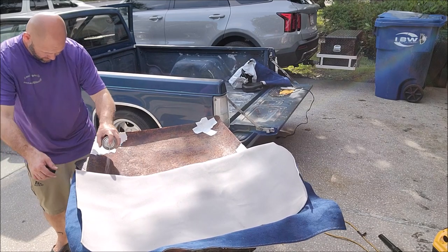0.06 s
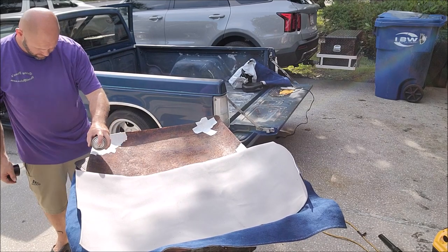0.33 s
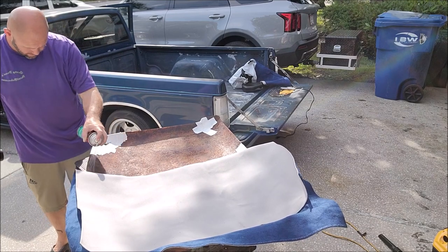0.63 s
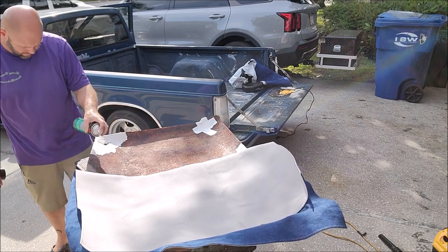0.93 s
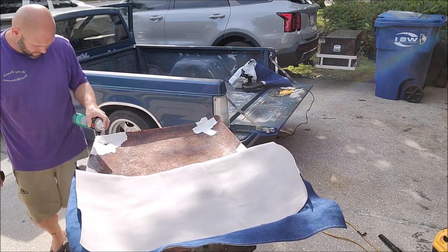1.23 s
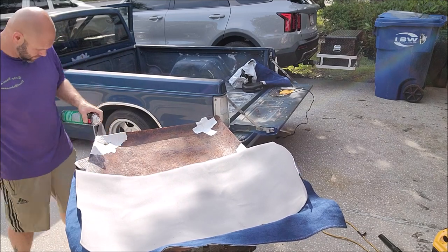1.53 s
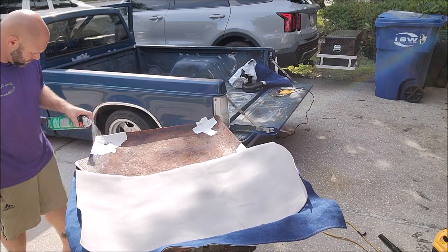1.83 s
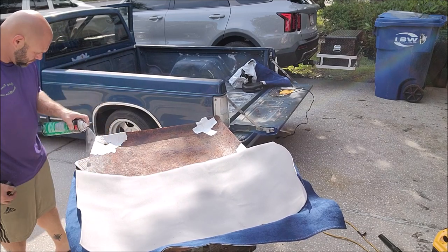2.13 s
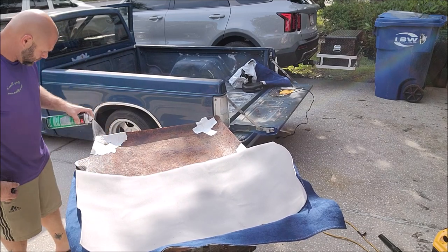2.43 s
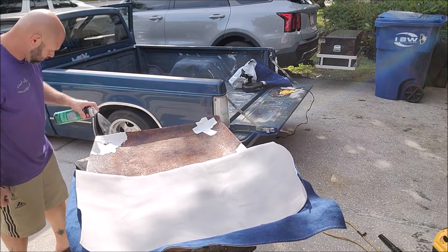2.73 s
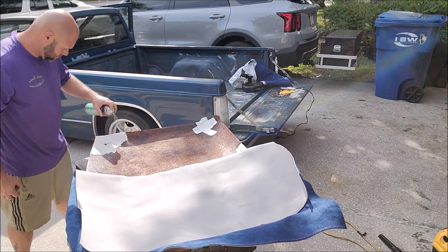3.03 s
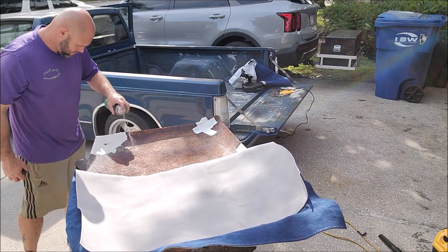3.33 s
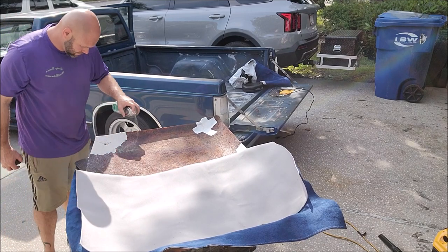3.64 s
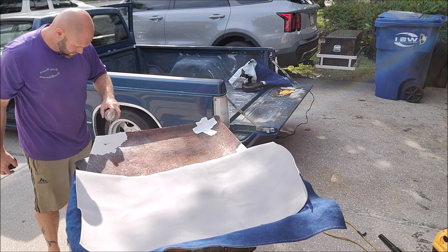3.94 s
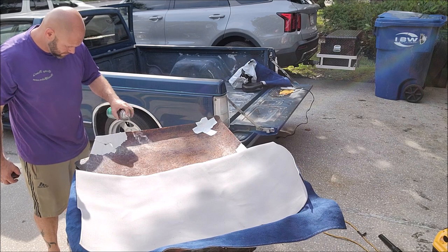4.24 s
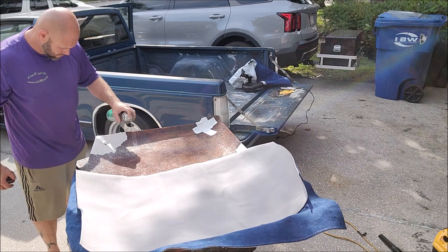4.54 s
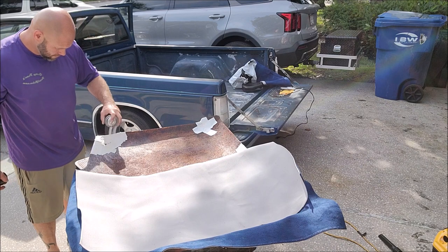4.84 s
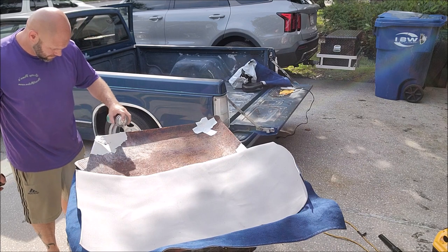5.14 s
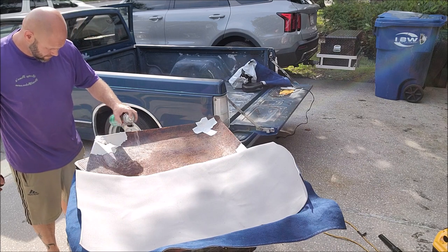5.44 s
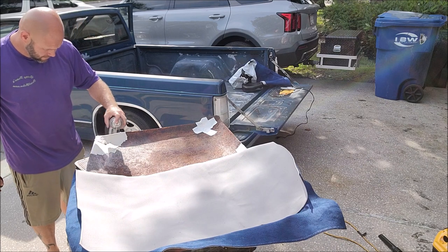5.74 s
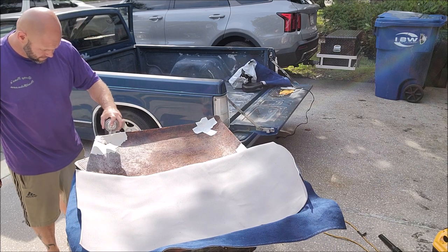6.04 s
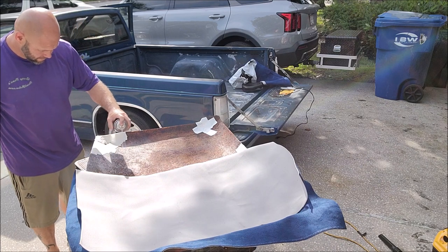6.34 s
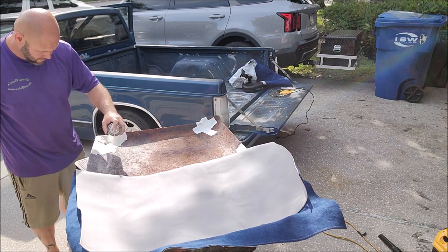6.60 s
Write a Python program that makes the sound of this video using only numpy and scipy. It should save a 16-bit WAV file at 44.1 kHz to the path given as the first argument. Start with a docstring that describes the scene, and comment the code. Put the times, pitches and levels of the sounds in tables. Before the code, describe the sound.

Bright, wavering hiss of spray adhesive, broken twice early on and then continuous, with a low traffic rumble behind.

```python
"""On a driveway, spray adhesive is swept over a curved sheet-metal panel in three passes.
Distant traffic rumbles throughout, with an engine humming under it. The hiss is turbulent jet noise,
beamed by the nozzle; it interferes with its reflection off the panel, so its colour shifts as the can
moves. A shoe scuffs the asphalt with gritty friction noise, and glue spits now and then in dull puffs."""
import sys
import numpy as np
from scipy import signal
from scipy.fft import rfft, irfft
from scipy.io import wavfile

SR = 44100
rng = np.random.default_rng(int(sys.argv[2]) if len(sys.argv) > 2 else 0)


def inscribe(sig):
    """Save sig as 16-bit PCM at rate SR to the path in sys.argv[1].

    A 1-D sig is mono; a 2-D sig holds one channel per row.
    Samples are clipped to [-1, 1] before scaling.
    """
    pcm = np.round(np.clip(np.atleast_2d(sig).T, -1, 1) * 32767)
    wavfile.write(sys.argv[1], SR, pcm.astype(np.int16))


N = 294147
TIME = np.arange(N) / SR


def from_db(db):
    """Amplitude ratio of a level in decibels."""
    return 10 ** (np.asarray(db) / 20)


def unit_rms(x):
    """Normalisation to a root mean square of 1."""
    return x / np.sqrt(np.mean(x ** 2) + 1e-20)


def in_time(rows, t=TIME):
    """Linear interpolation of a table's columns at times t."""
    times, *columns = np.transpose(rows)
    return [np.interp(t, times, column) for column in columns]


def at_hz(rows, hz):
    """Interpolation of a table's columns on a log-frequency axis."""
    freqs, *columns = np.transpose(rows)
    return [np.interp(np.log(hz + 1), np.log(freqs), column) for column in columns]


def bell(x, centre, width):
    """Gaussian curve of height 1; width is its standard deviation."""
    return np.exp(-.5 * ((x - centre) / width) ** 2)


def drift(rate_hz):
    """Random fluctuation of rms 1: noise low-passed at rate_hz."""
    step, settle = 20, 4000
    pole = np.exp(-2 * np.pi * rate_hz * step / SR)
    noise = rng.standard_normal(N // step + settle + 2)
    slow = signal.lfilter([1], [1, -2 * pole, pole * pole], noise)[settle:]
    return np.interp(np.arange(N) / step, np.arange(len(slow)), unit_rms(slow))


def noise_pair(coherence, lag_ms, frame):
    """Short-time spectra of partly coherent white noise; the shared part arrives later on the right."""
    hz, t, (left, independent) = signal.stft(rng.standard_normal((2, N)), SR, "cosine", nperseg=frame)
    hz = hz[:, None]
    shared = np.clip(at_hz(coherence, hz)[0], 0, 1)
    delay = np.exp(-2j * np.pi * hz * lag_ms / 1000)
    right = shared * delay * left + np.sqrt(1 - shared ** 2) * independent
    return hz, t, np.array([left, right])


def to_sound(spectra):
    """Overlap-add synthesis of a stereo waveform."""
    return signal.istft(spectra, SR, "cosine")[1][:, :N]


def coloured_noise(spectrum, coherence, lag_ms=0):
    """Spectral shaping of stereo noise, at rms 1."""
    hz, t, noise = noise_pair(coherence, lag_ms, frame=2048)
    return unit_rms(to_sound(noise * from_db(at_hz(spectrum, hz)[0])))


# far vehicles passing: nearest_s, half_length_s, rumble_db, drone_db, tyres_db
PASSING_VEHICLES = [(0.414, 0.49, -46.5, -64, -75), (2.46, 0.31, -51, -52, -62),
                    (2.973, 0.22, -71, -52.5, -64.5), (5.02, 0.19, -72, -72, -54.5),
                    (5.68, 0.22, -52, -48, -50), (6.113, 0.16, -63, -53, -56),
                    (6.568, 0.29, -58, -53, -48.5)]
# the steady town behind them: rumble_db, drone_db, tyres_db
TOWN_LEVELS = (-49, -61, -69)

def traffic_amplitudes():
    """Inverse-square law: each vehicle's power falls with distance and adds to that of the town."""
    power = from_db(TOWN_LEVELS)[:, None] ** 2
    for nearest_s, half_length_s, *levels_db in PASSING_VEHICLES:
        distance_squared = 1 + ((TIME - nearest_s) / half_length_s) ** 2
        power = power + from_db(levels_db)[:, None] ** 2 / distance_squared
    return np.sqrt(power)


def engine(pitch_hz, level_db):
    """A hum: one sinusoid under slow random frequency and amplitude modulation."""
    cycles = np.cumsum(pitch_hz * (1 + .0044 * drift(2.7))) / SR
    return from_db(level_db + 2.8 * drift(3.9)) * np.sqrt(2) * np.sin(2 * np.pi * cycles)


# spectra of traffic rumble, road drone, tyre noise and yard air: frequency_hz, relative_db
RUMBLE_SPECTRUM = [(20, -44), (32, 0), (48, -1), (68, 3), (100, -3.5), (150, -5), (230, -14), (330, -31.5),
                   (450, -74)]
DRONE_SPECTRUM = [(80, -2.5), (160, 1), (220, 7.5), (300, 5), (390, -2.5), (500, -2), (620, -36),
                  (1500, -28.5)]
TYRE_SPECTRUM = [(250, -9), (550, -5), (750, -1.5), (1050, -1), (1400, -5.5), (2000, -7), (3500, -18),
                 (7000, -23), (16000, -57)]
AIR_SPECTRUM = [(200, -37), (1000, -2), (1700, -19), (2800, -4), (4500, -14), (8000, -36), (16000, -32)]
# left-right likeness of far sounds and of the tyres: frequency_hz, coherence
FAR_COHERENCE = [(30, 0.7), (130, 0.83), (280, 0.74), (550, 0.78), (1000, 0.14), (16000, 0)]
TYRE_COHERENCE, TYRE_LAG_MS = [(250, .91), (1000, .53), (2500, .055), (8000, .05)], .36

def street(air_db, pan_db, drone_waver_db=1.2, tyre_waver_db=.8):
    """Superposition of independent sources: three bands of traffic noise, yard air and an engine."""
    rumble, drone, tyres = traffic_amplitudes()
    sound = rumble * coloured_noise(RUMBLE_SPECTRUM, FAR_COHERENCE)
    drone *= from_db(drone_waver_db * drift(3.9))
    sound += drone * coloured_noise(DRONE_SPECTRUM, FAR_COHERENCE)
    tyres *= from_db(tyre_waver_db * drift(25))
    sound += tyres * coloured_noise(TYRE_SPECTRUM, TYRE_COHERENCE, TYRE_LAG_MS)
    sound += from_db(air_db) * coloured_noise(AIR_SPECTRUM, FAR_COHERENCE)
    sound += engine(pitch_hz=34.8, level_db=-61.5)
    return sound * from_db([[pan_db / 2], [-pan_db / 2]])


# nozzle held down: start_s, release_s
NOZZLE_PRESSES = [(0.045, .398), (0.542, 1.701), (1.861, 6.9)]

def valve(open_s, close_s):
    """The valve opens quickly; after release the pressure in the stem decays exponentially."""
    return sum(np.clip((TIME - on) / open_s, 0, 1) ** 2 * np.exp(-np.maximum(TIME - off, 0) / close_s)
               for on, off in NOZZLE_PRESSES)


def surge(t, peak_db, settle_s):
    """Onset transient in dB: each press starts louder while the pressure in the stem settles."""
    return sum(peak_db * (t > on) * np.exp(-np.abs(t - on) / settle_s) for on, _ in NOZZLE_PRESSES)


# how squarely the jet faces the microphones: time_s, rush_gain_db
JET_FACING = [(.22, 0.5), (.28, -5), (.41, -5), (.55, -0.5), (1.35, 0.3), (1.9, -0.8), (2.4, 0.3),
              (2.99, -0.5), (3.05, 5.3), (3.22, 3), (3.38, 6), (3.47, 5.7), (3.53, 3.3), (3.8, 5),
              (4.05, 5.5), (4.4, 4.2), (4.6, 5.3), (4.85, 4.3), (5.04, 3.3), (5.12, 1.8), (5.7, -0.8),
              (6.66, 0)]
# the wrist swings the beam towards them or away: centre_s, width_s, hiss_gain_db
WRIST_SWINGS = [(.1, .02, 2), (0.615, .035, 2.5), (0.922, .03, 2.5), (1.11, 0.041, -2), (1.656, .03, 3),
                (2.41, .025, 1), (2.98, .025, -1.5), (3.21, .05, -2.5), (3.44, 0.03, 2.8), (3.51, .014, -3),
                (3.64, 0.02, 2), (3.715, .024, -4.5), (3.8, .02, -2), (3.875, .014, -4.5),
                (3.93, 0.016, 6.5), (4.025, .025, 3), (4.08, 0.022, 5.5), (4.19, .015, -2.5),
                (4.245, .014, 2.5), (4.56, .02, 1.5), (4.83, .015, -3), (4.89, .015, 1.5), (4.96, .02, -2),
                (5.02, .018, 2), (6.503, 0.11, 2.5)]

def directivity(t):
    """Gains in dB for the hiss and the rush as the can turns: the rush follows the facing in full, the hiss at
    0.69 of it, while wrist swings sway mainly the hiss."""
    facing_db, = in_time(JET_FACING, t)
    swing_db = sum(db * bell(t, centre_s, width_s) for centre_s, width_s, db in WRIST_SWINGS)
    return .69 * facing_db + swing_db, facing_db + .12 * swing_db


# bands of the hiss that swell or fade: centre_s, width_s, centre_hz, width_hz, left_db, right_db
HISS_BANDS = [(0.3, 0.41, 8050, 190, -12, -14), (.2, .2, 12500, 450, -1, -8),
              (1.0, 0.45, 11900, 700, -3, -1.5), (1.052, 0.22, 14300, 500, -2, -1),
              (.15, 0.17, 3750, 400, -3, -4), (.9, .35, 3180, 260, 0, 0), (.7, 0.81, 4630, 260, -3, -4),
              (1.975, 0.23, 5400, 170, -3, -15), (2.0, 0.23, 8300, 200, -5, -16),
              (2.547, 0.35, 6150, 350, -2, -10), (2.55, 0.44, 8500, 350, -3, -6),
              (2.707, 0.15, 3000, 150, -22, -23), (3.03, 0.019, 7400, 300, 10, 4),
              (3.4, 0.047, 7400, 356, 9.5, 6), (3.895, 0.33, 7800, 210, 5.5, 2),
              (3.934, 0.028, 4570, 160, -13, -2), (3.997, 0.11, 6250, 750, 7.5, 8),
              (4.152, 0.025, 5020, 170, 10, 6), (4.47, 0.028, 4430, 180, -18, -3),
              (4.55, 0.33, 2720, 252, -9, -10), (4.583, 0.035, 3660, 300, 10, 9),
              (5.31, .1, 5000, 166, 2, 2), (5.567, 0.034, 3960, 250, 3, -3),
              (6.0, 0.64, 7800, 300, -4.5, 1)]

def hiss_bands(hz, t):
    """Time-varying filtering: gain in dB of bands that swell or fade for a while, left and right."""
    return sum(np.multiply.outer(sides_db, bell(t, centre_s, width_s) * bell(hz, centre_hz, width_hz))
               for centre_s, width_s, centre_hz, width_hz, *sides_db in HISS_BANDS)


# lag of the path by way of the panel as the can moves: time_s, delay_ms
REFLECTION_DELAY = [(1.2, .18), (1.6, .29), (2.98, .275), (3.06, .40), (3.42, .415), (3.8, .39),
                    (4.25, .405), (4.8, .395), (5.05, .42), (5.42, .42), (5.5, .49), (5.64, .485),
                    (5.76, .405), (5.92, .478), (6.15, .44), (6.34, .485), (6.45, .48), (6.56, .40)]
# the jet glances off the curve towards the microphones: centre_s, half_length_s, extra_reflection
PANEL_GLANCES = [(1.9, .3, .12), (2.55, .35, .25), (3.40, .085, .64), (3.77, .13, .45), (4.24, .13, .62),
                 (4.63, .095, .56), (4.80, .045, .52), (5.07, .09, .25), (5.31, .13, .58),
                 (5.56, .085, .72), (5.78, .06, .3), (5.96, .075, .55), (6.14, .06, .2), (6.38, .1, .7)]

def panel_comb(hz, t, fade_hz, base_reflection=.12):
    """Comb filtering: direct and reflected sound add and cancel in turn along frequency."""
    delay_ms, = in_time(REFLECTION_DELAY, t)
    glances = sum(extra * np.exp(-((t - centre_s) / half_length_s) ** 4)
                  for centre_s, half_length_s, extra in PANEL_GLANCES)
    reflection = (base_reflection + glances) / np.sqrt(1 + (hz / fade_hz) ** 6)
    return np.abs(1 + reflection * np.exp(-2j * np.pi * hz * delay_ms / 1000))


def scatter(hz, t, strength, fade_hz, width_hz, hold_s):
    """Multipath interference: many small reflections give the hiss a shifting, random ripple."""
    grid_hz, grid_s = np.arange(0, SR / 2, 40), np.arange(0, N / SR, .02)
    real, imag = rng.standard_normal((2, 2, len(grid_hz), len(grid_s)))
    smooth_hz, smooth_s = bell(hz, grid_hz, width_hz), bell(t, grid_s[:, None], hold_s)
    paths = unit_rms(smooth_hz @ real @ smooth_s) + 1j * unit_rms(smooth_hz @ imag @ smooth_s)
    share = strength / np.sqrt(1 + (hz / fade_hz) ** 2)  # the beamed treble meets fewer surfaces
    return (1 + share * paths) / np.sqrt(1 + 2 * share ** 2)


# relative spectrum of the jet: frequency_hz, left_db, right_db
JET_SPECTRUM = [(474, -12.5, -10.5), (1220, -16.5, -15), (2100, -11.5, -10), (2490, -3, -6),
                (3400, -1.5, 0), (4370, -1.5, 0), (4460, -1.5, 0.5), (5160, 2, -6), (5870, -1.5, -6.5),
                (8100, 1.5, -5), (7700, 5, 2), (8050, 1.5, -3), (9740, 1, -11.5), (11650, -1.5, 4),
                (12500, 1.5, 2), (13800, 1, -3), (15800, 1.5, 1.5)]
# spectral crest set by the aim of the can: time_s, centre_hz, height_db
JET_CREST = [(.1, 10500, -2), (.6, 11000, 7), (.9, 12300, 8), (1.38, 12500, 12), (1.5, 12700, 4),
             (1.56, 14600, 6), (1.68, 15300, 10), (1.92, 15200, 11), (2.7, 14400, 2), (3.1, 13400, 5),
             (4.1, 14100, 9.5), (5.0, 13900, 4), (5.7, 14500, 2), (6.6, 15200, 9)]
# part of that height at each microphone: left_share, right_share
CREST_SIDES = (0.82, 0.35)
# steady narrow gaps heard in the hiss: centre_hz, width_hz, gain_db
HISS_DIPS = [(2665, 100, -22), (1630, 70, -5)]

def hiss_filter(hz, t, crest_width_hz):
    """Filters in cascade: the colour of the hiss as heard, with its crest, bands, dips and ripple."""
    crest_hz, height_db = in_time(JET_CREST, t)
    crest_db = np.multiply.outer(CREST_SIDES, height_db * bell(hz, crest_hz, crest_width_hz))
    dips_db = sum(db * bell(hz, centre_hz, width_hz) for centre_hz, width_hz, db in HISS_DIPS)
    colour_db = np.array(at_hz(JET_SPECTRUM, hz)) + crest_db + hiss_bands(hz, t) + dips_db
    fine_ripple = scatter(hz, t, strength=1.3, fade_hz=4770, width_hz=22, hold_s=.027)
    # surfaces close to the nozzle colour broader patches, alike at both microphones
    broad_ripple = scatter(hz, t, strength=.19, fade_hz=8000, width_hz=170, hold_s=.03)[0]
    return from_db(colour_db) * panel_comb(hz, t, fade_hz=8540) * fine_ripple * broad_ripple


# left-right likeness of the jet: frequency_hz, coherence
JET_COHERENCE = [(500, 0.32), (1700, 0.9), (3000, 1), (5000, .9), (8000, 0.78), (11000, 0.58),
                 (16000, 0.45)]

def spray(hiss_db, rush_db, flutter_db, sputter_db, crossover_hz=9000):
    """Turbulence radiates broadband noise: a high hiss over a lower rush, gated by the valve."""
    hz, t, noise = noise_pair(JET_COHERENCE, lag_ms=.17, frame=1024)
    shape = hiss_filter(hz, t, crest_width_hz=880)
    hiss_aim_db, rush_aim_db = directivity(t)
    surge_db = surge(t, peak_db=2, settle_s=.13)
    treble = .5 + .5 * np.tanh((hz - crossover_hz) / 700)
    gain = 0
    for share, level_db in ((treble, hiss_db + hiss_aim_db), (1 - treble, rush_db + rush_aim_db)):
        band = shape * share
        band_rms = np.sqrt(np.mean(np.abs(band) ** 2, axis=(0, 1)))
        gain = gain + band / band_rms * from_db(level_db + surge_db)
    # thick glue leaves the nozzle unevenly; the hand adds flutter as the jet faces the microphones
    flutter_depth_db = flutter_db + .03 * in_time(JET_FACING)[0]
    flow = from_db(flutter_depth_db * drift(8.3) - sputter_db * drift(350))
    return to_sound(noise * gain) * flow * valve(open_s=.027, close_s=.014)


# a shoe touches down and slides: peak_s, level_db, rise_s, decay_s
SHOE_DRAGS = [(1.44, -52, 0.05, 0.07), (1.513, -40.8, .02, .016)]
# spectrum of the sole on grit: frequency_hz, relative_db
SHOE_SPECTRUM = [(300, -30), (900, -14), (1300, -0.5), (2200, -2.5), (3400, 3.5), (4300, -1.5), (5400, -6),
                 (7200, -2.5), (10000, -27), (16000, -29)]
# its left-right likeness: frequency_hz, coherence
SHOE_COHERENCE = [(500, 0.5), (3000, 0.5), (10000, 0.1)]

def shoe_scuff(grit_db, grit_rate_hz, half_hold_s=.013):
    """Sliding friction: a sole drags over asphalt, and catching on grains modulates the noise."""
    drag = 0
    for peak_s, level_db, rise_s, decay_s in SHOE_DRAGS:
        before_s = np.maximum(peak_s - half_hold_s - TIME, 0)
        after_s = np.maximum(TIME - peak_s - half_hold_s, 0)
        drag += from_db(level_db) * np.exp(-before_s / rise_s - after_s / decay_s)
    grit = from_db(grit_db * drift(grit_rate_hz))
    return drag * grit * coloured_noise(SHOE_SPECTRUM, SHOE_COHERENCE, lag_ms=.28)


# blobs of glue leaving the nozzle: start_s, level_db
GLUE_BLOBS = [(1.640, -51), (1.96, -51), (3.75, -49), (4.138, -46.5), (4.248, -46), (4.605, -49)]
# spectrum of their puffs: frequency_hz, relative_db
PUFF_SPECTRUM = [(300, -15), (1000, -3.5), (2100, -6), (2700, -15), (3400, -3), (8000, -14), (16000, -39)]

def glue_spits(decay_s):
    """Impulsive excitation: each blob bursts out as a dull puff of noise that decays exponentially."""
    puffs = sum(from_db(level_db) * (TIME >= start_s) * np.exp(-np.abs(TIME - start_s) / decay_s)
                for start_s, level_db in GLUE_BLOBS)
    return puffs * coloured_noise(PUFF_SPECTRUM, JET_COHERENCE, lag_ms=.26)


def yard_echo(sound, t60_s, cutoff_hz):
    """Diffuse reflection from parked cars and walls: convolution with a short, dull noise tail."""
    t = TIME[:SR // 2]
    tail = rng.standard_normal((2, len(t))) * from_db(-60 * t / t60_s) * (t > .008)
    tail /= np.sqrt(np.sum(tail ** 2, axis=1, keepdims=True))
    tail = signal.sosfilt(signal.butter(2, cutoff_hz, fs=SR, output="sos"), tail)
    return signal.fftconvolve(sound, tail, axes=1)[:, :N]


def scene():
    """Superposition of the spray and shoe nearby, their echo, and the street behind."""
    near = spray(hiss_db=-36.5, rush_db=-44, flutter_db=.89, sputter_db=.44)
    near += glue_spits(decay_s=.02)
    near += shoe_scuff(grit_db=2, grit_rate_hz=700)
    far = street(air_db=-69, pan_db=-1.5)
    echo = from_db(-20) * yard_echo(near, t60_s=.3, cutoff_hz=10000)
    return near + echo + far


def record(dry):
    """Band limiting: a steep low-pass filter removes the highest treble."""
    cutoff_hz, edge_hz = 15850, 60
    hz = np.arange(N // 2 + 1) * SR / N
    low_pass = .5 - .5 * np.tanh((hz - cutoff_hz) / edge_hz)
    return irfft(rfft(dry) * low_pass, N)


dry = scene()
out = record(dry)
inscribe(out)
```